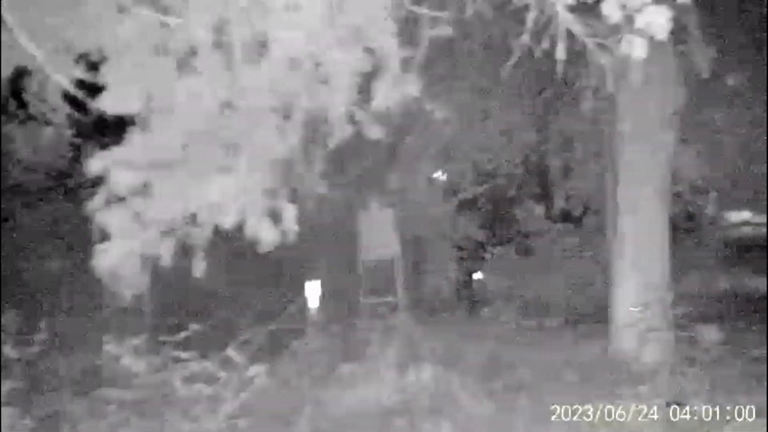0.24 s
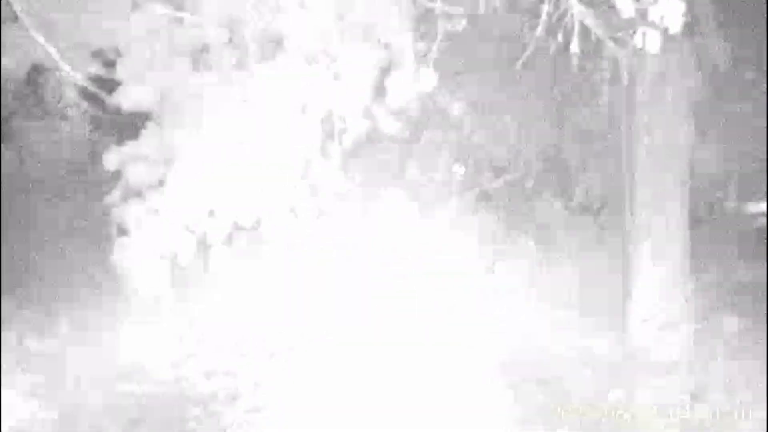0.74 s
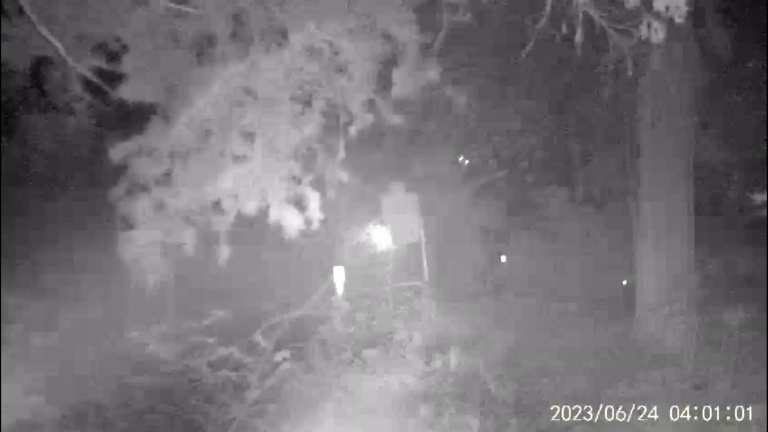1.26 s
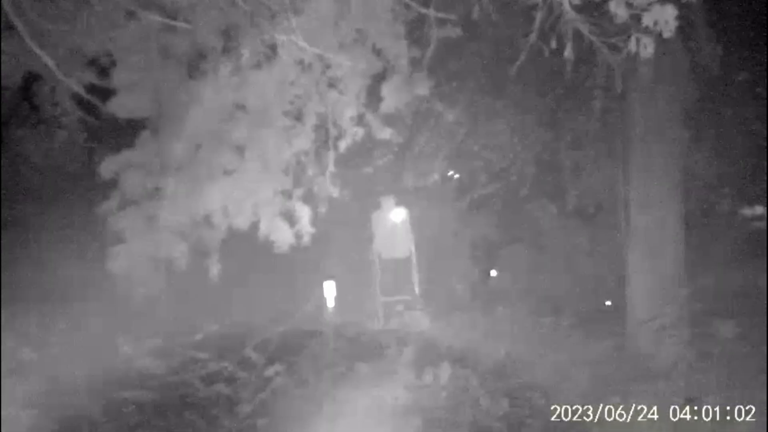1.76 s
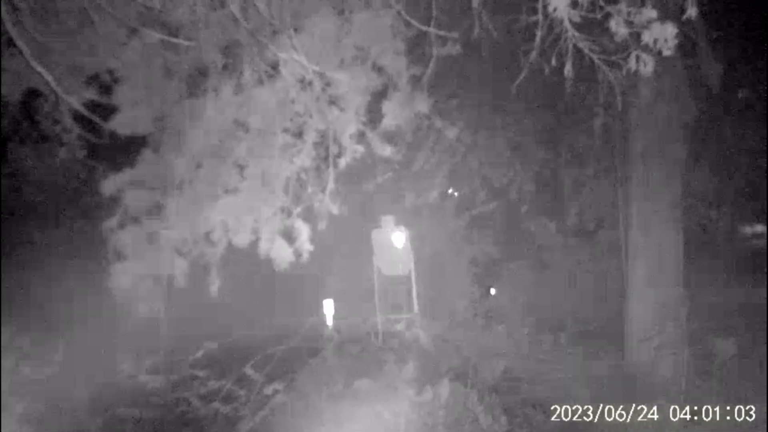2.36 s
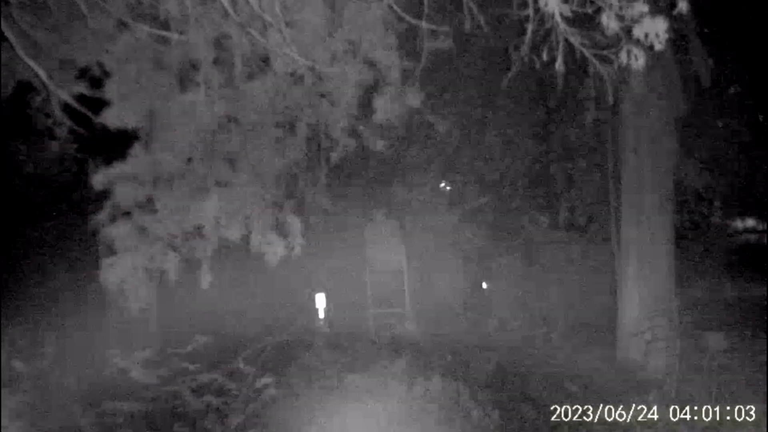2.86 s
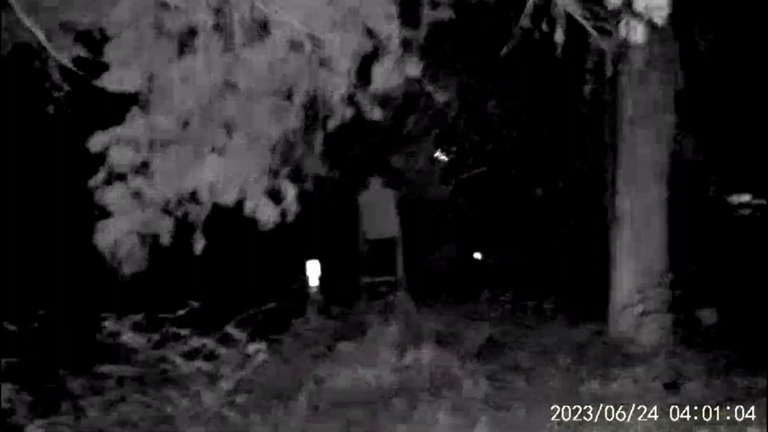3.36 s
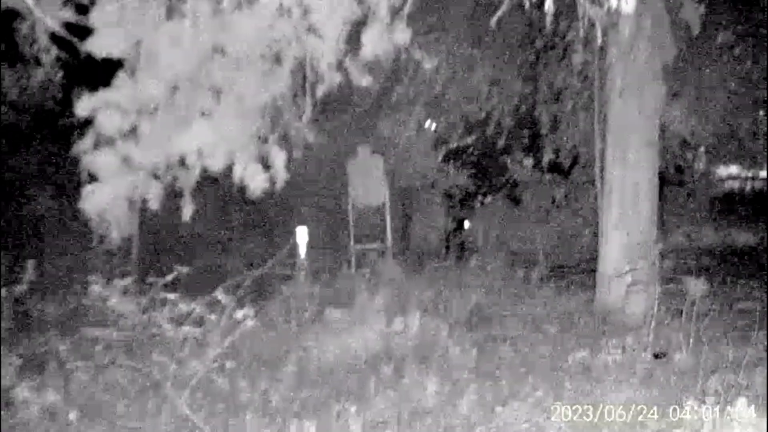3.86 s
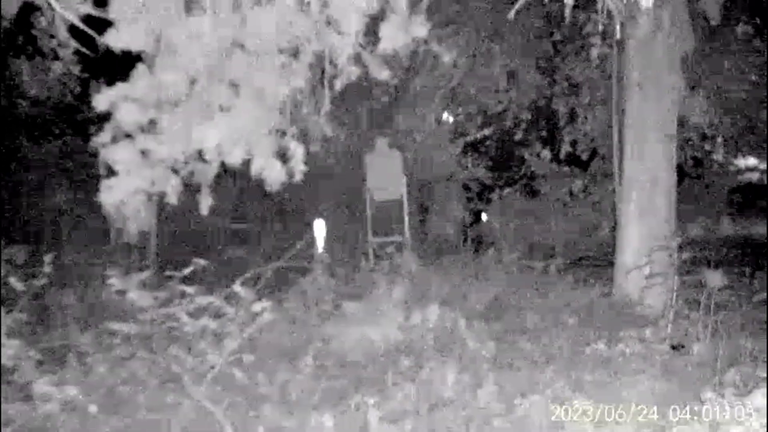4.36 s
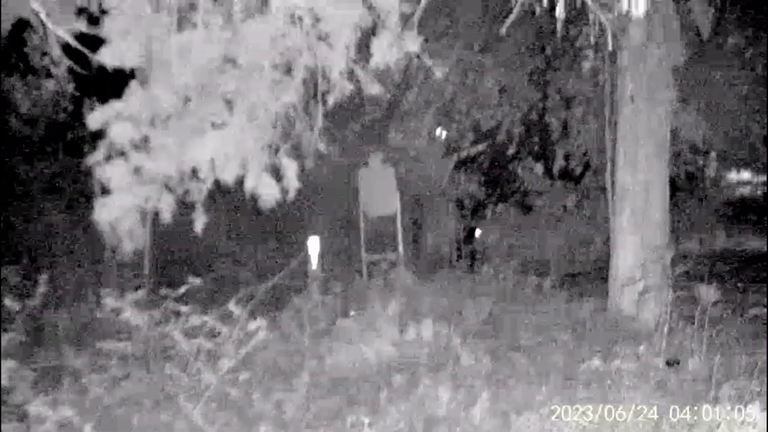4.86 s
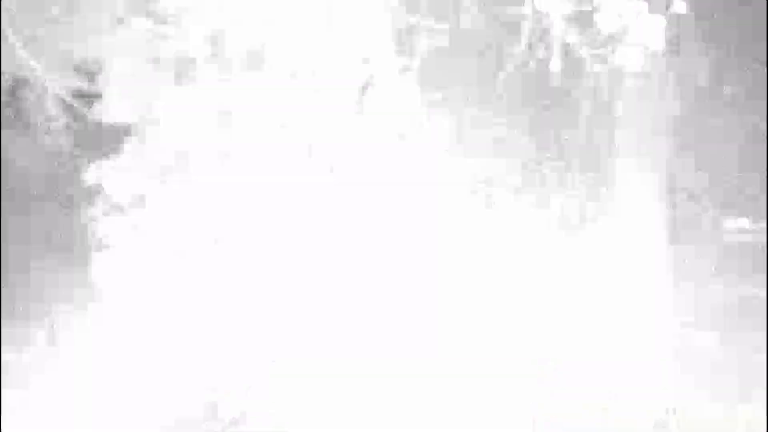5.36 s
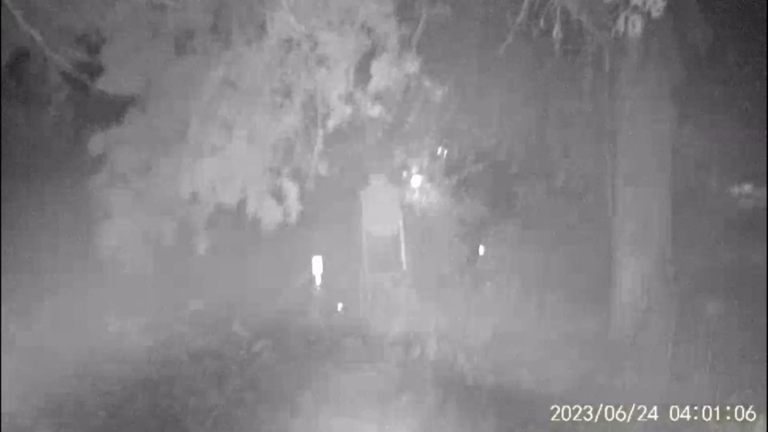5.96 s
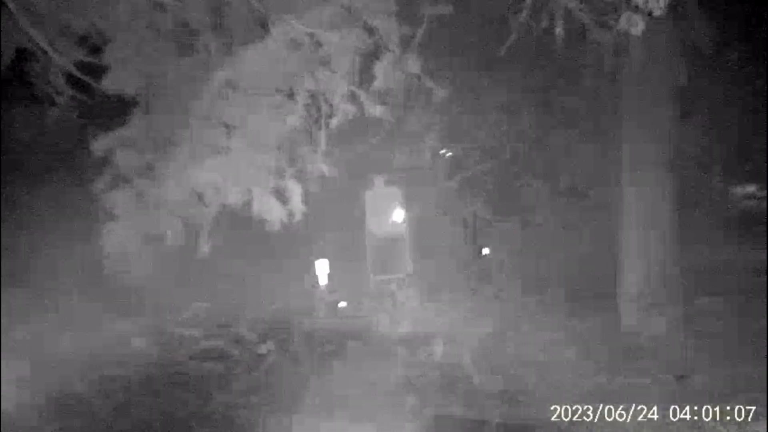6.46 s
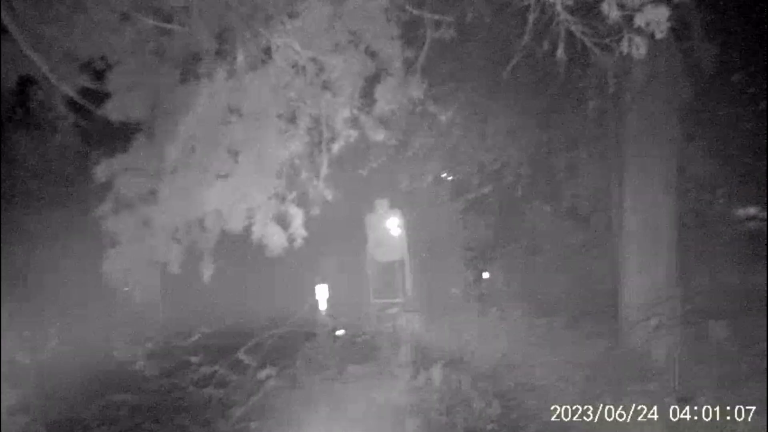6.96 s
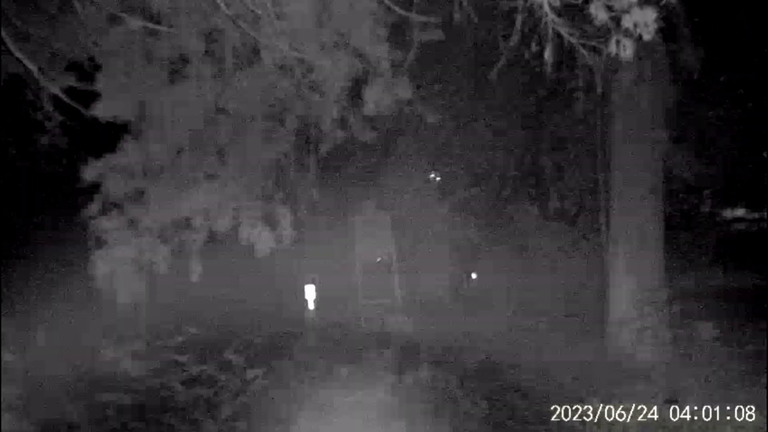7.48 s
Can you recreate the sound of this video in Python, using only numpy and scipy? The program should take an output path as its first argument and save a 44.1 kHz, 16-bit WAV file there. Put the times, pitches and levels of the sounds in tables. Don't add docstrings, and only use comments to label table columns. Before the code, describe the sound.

Close metallic rifle clicks in two quick double trigger pulls, each with a scrape, tiny spring squeak and reset snap, over a quiet night outdoors.

```python
import sys
import numpy as np
from scipy import signal
from scipy.fft import rfft, irfft, next_fast_len
from scipy.io import wavfile
from scipy.ndimage import uniform_filter1d, map_coordinates

SR = 44100
rng = np.random.default_rng(int(sys.argv[2]) if len(sys.argv) > 2 else 0)


def gain_from_db(level_db):
    decades = np.asarray(level_db, float) / 20
    return 10 ** decades


def store_pcm(level_fs):
    pcm = np.round(np.clip(level_fs, -1, 1) * 32767).astype(np.int16)
    wavfile.write(sys.argv[1], SR, np.atleast_2d(pcm).T)


N = 340452

# pitch_hz, level_db (per Hz)
RUMBLE_SPECTRUM = [(12, -41.5), (20, -22.5), (45, -2.5), (65, 2), (150, -5), (256, -10.5), (300, -20),
                   (390, -42.5), (660, -120)]
# pitch_hz, level_db (per Hz)
DRONE_SPECTRUM = [(150, -41), (250, -13.5), (422, -4.5), (447, -5), (530, -3.5), (763, -6.5), (885, -5.5),
                  (980, -8.5), (1480, -12.5), (3800, -36.5), (4940, -66.5), (8360, -120)]
# pitch_hz, level_db (per Hz)
HISS_SPECTRUM = [(1500, -3.5), (3000, -6), (6000, -9), (9000, -14), (10600, -21), (13000, -13),
                 (15500, -16), (15900, -60)]
# time_s, level_db (at 420 Hz), level_db (at 490 Hz)
HUM_LEVELS = [(0, -56, -56.5), (1.2, -56, -57.5), (1.8, -57.5, -64), (3, -60, -70), (4, -68, -72),
              (7.72, -66, -72)]
# pitch_hz, width_hz, level_db
CRICKET_BANDS = [(4400, 850, -73), (4120, 160, -79), (4450, 110, -79)]
# time_s, level_db
CHORUS_SWELL = [(0, 2.5), (1, -1), (2, 0.5), (3, 3.5), (3.8, 4), (4.3, 4.5), (5, 3), (6, -1.5), (7, 0.5),
                (7.72, 0.5)]
RUMBLE_DB, DRONE_DB, HISS_DB = -47.5, -49, -70.5
DRONE_FOLLOWS = 0.17
DUCK_DB, DUCK_S = 4.5, .15

# pitch_hz, level_db (per Hz)
CLOTH_SPECTRUM = [(880, -26), (1500, 0), (2380, -1), (2850, 1.5), (4130, -0.5), (6620, 2), (10400, -7),
                  (14200, -8.5), (15900, -10.5), (16500, -38.5)]
# peak_s, level_db, rise_s (over 20 dB), fall_s (over 20 dB)
CLOTH_STROKES = [(.06, -53.5, .8, .6), (.25, -54, 0.3, 0.4465), (.46, -58.5, 1, 0.3), (.56, -64, .08, .1),
                 (.625, -62, .06, .06), (.7, -66, .08, .05), (.86, -68, .04, .06), (1.3, -75.5, 1.5, 1),
                 (2.68, -63, 0.53, 0.2), (2.9, -65, 0.33, 0.65), (3.1, -58, 0.05, 0.4369),
                 (3.31, -48.5, .5, .15), (3.43, -58, 0.07, .4), (3.7, -67, 0.12, .5), (4.52, -64, .1, 0.9),
                 (4.74, -57, 0.23, .5), (5.02, -49.5, 0.302, 0.3548), (5.13, -54, 0.22, 0.2064),
                 (5.22, -51.5, .3, 0.2241), (5.33, -58, 0.21, 0.16), (5.65, -76, 0.54, 0.08),
                 (7.22, -60.5, 0.07, 0.29), (7.41, -63, .15, .1), (7.5, -63.5, 0.3, .5),
                 (7.69, -52, .2, .15)]

# start_s, level_db (energy in 1 ms), knock_db, snap_db
SEAR = [
    (2.1856, -7.5, -6.5, -11),
    (2.3875, -8.5, -4.5, -10),
    (6.8504, -7.5, -5.5, -8.5),
    (7.0345, -8, -6, -10),
]
RELEASE = [
    (2.2553, -8.5, -7, -8),
    (2.4509, -14.5, -4, -1.5),
    (2.4531, -9.5, -5, -15),
    (6.9154, -10.5, -17, -5.5),
]
HAMMER = [
    (2.2705, -6.5, -11, -12),
    (2.4663, -5.5, -11, -10.5),
    (6.9268, -4.5, -13, -11.5),
    (7.118, -6, -11, -7),
]
RESET = [
    (2.2972, -6, -8.5, -6),
    (2.4847, -7, -8, -5.5),
    (6.9599, -6.2, -7, -5.5),
    (7.1357, -6.5, -7.5, -5),
]
REBOUND = [
    (2.2817, -25, 3, -4),
    (2.4755, -25, 0, -4),
    (6.9363, -24, 2, -4),
    (7.1284, -21, -1, -3),
]
BOUNCE = [
    (2.2175, -21, -6.5, -7),
    (2.241, -30, -6, -8),
    (2.4137, -27.5, -12, -10),
    (6.8756, -26, -6, -6),
    (6.9013, -24.5, -14.5, -22),
    (6.9111, -19, -4, -4),
    (7.0651, -27, 0.5, -8),
    (7.0945, -27, -7, -11.5),
    (7.1024, -18.5, -4.5, -9),
    (7.1418, -22, -3, -10),
]
LEVER_OFF = [
    (0.3522, -33, -7.5, -3.5),
    (0.3573, -14, -5.5, -1),
]
LEVER_ON = [
    (5.0897, -28, -3, -3.5),
    (5.0923, -11, -5.5, 2.5),
]
END_STOP = [
    (2.8249, -16, -13, -6),
    (2.8276, -11.5, -11, -4),
]
LATE_STOP = [
    (7.4287, -17.5, -12, -8),
    (7.4328, -12.5, -10, 1),
    (7.4347, -13.5, -4, 0),
]
CATCH = [
    (5.161, -15, -15, 1),
    (5.1638, -33, 3, -6),
]
SLACK = [(0.102, -43, 2, -26), (1.9334, -25, -6, -16), (2.3703, -28, -4, -6), (3.096, -48.5, -1, -18),
         (3.4262, -37, -2, -9), (3.4569, -41.5, -6.5, -15), (3.5365, -59, -20, 6), (3.645, -51, -14, -12),
         (3.878, -60, -14, -3), (4.6487, -48, -14.5, -16), (5.6524, -54, -15.5, -16),
         (6.8096, -26, -8, -16), (7.012, -29, -4, -5), (7.3965, -53, -20, -2), (7.405, -52, -20, 3),
         (7.6476, -40, -2, -13.5)]
NUDGE = [
    (0.3195, -30.5, -25, -9.5),
    (5.0491, -37.5, -19.5, -15.5),
]
TAP = [
    (0.2951, -41, -20, -25),
    (3.5841, -40.5, -9.5, -19),
]

# pitch_hz, width_hz, level_db
SEAR_MODES = [(480, 150, -19), (958, 170, -4), (1500, 150, -3), (1880, 220, 2), (2350, 350, -1),
              (3330, 480, -2), (4300, 400, -5), (4950, 250, -3), (6000, 900, -10), (7500, 600, -17),
              (8900, 900, -15), (10900, 1500, -15), (13000, 650, -9), (14900, 760, -15)]
RELEASE_MODES = [(600, 250, -13), (950, 200, -7), (1440, 230, -3), (2050, 400, -7), (3040, 330, 0),
                 (3600, 300, -7), (4250, 500, -4), (5200, 500, -12), (7390, 860, -11), (8460, 360, -12),
                 (9350, 330, -13), (12400, 1500, -24), (14100, 500, -18), (15600, 500, -21)]
HAMMER_MODES = [(430, 150, -22), (888, 210, -8), (1300, 200, -12), (1850, 250, -10), (2430, 350, 0),
                (2870, 250, 0), (3450, 300, -8), (4250, 380, -1), (5200, 500, -5), (6300, 600, -11),
                (7400, 500, -16), (8560, 410, -11), (12200, 2500, -26), (15600, 500, -19)]
RESET_MODES = [(620, 150, -14), (964, 190, -5), (1440, 220, -4), (1900, 250, -7), (2250, 300, -6),
               (3150, 450, 0), (4460, 610, -1), (6300, 600, -8), (7290, 480, -5), (8500, 500, -12),
               (10200, 450, -24), (12600, 700, -23), (14100, 500, -17), (15100, 400, -21)]
REBOUND_MODES = [(900, 200, -4), (1500, 250, 0), (2700, 500, -4), (3600, 400, -4), (4600, 600, -7),
                 (5800, 400, -11), (7000, 800, -7), (8500, 600, -8), (9500, 500, -7), (11500, 800, -15),
                 (14000, 1500, -13)]
LEVER_OFF_MODES = [(587, 150, -4), (1030, 120, -14), (1560, 240, -3), (2150, 200, -8), (2900, 300, 0),
                   (3550, 250, -6), (4400, 400, -3), (5000, 260, -10), (5950, 400, -3), (7070, 390, -5),
                   (8300, 390, -5), (9600, 700, -7), (12000, 2000, -13), (15500, 410, -16)]
LEVER_ON_MODES = [(587, 150, -3), (1030, 150, -11), (1560, 300, -2), (2150, 300, -1), (2650, 250, -3),
                  (3250, 300, -2), (4200, 400, -3), (4860, 300, -2), (6200, 330, -2), (7050, 390, 0),
                  (8410, 390, 0), (9900, 900, -5), (13000, 1200, -13), (15500, 410, -16)]
END_STOP_MODES = [(600, 350, -14), (1550, 300, -10), (2300, 300, -7), (2850, 300, 0), (3300, 300, -5),
                  (4000, 400, -10), (4650, 300, -8), (5100, 300, -6), (6300, 500, -13), (7520, 400, -9),
                  (8660, 400, -6), (9700, 500, -13), (11100, 1080, -13), (14200, 1500, -13)]
LATE_STOP_MODES = [(900, 300, -15), (1500, 300, -6), (2200, 300, -8), (2750, 300, -2), (3150, 300, 0),
                   (4300, 450, -3), (4950, 300, -4), (6050, 300, -6), (6800, 400, -3), (7500, 300, -8),
                   (8600, 450, 0), (9500, 300, -8), (11100, 1080, -13), (13400, 1500, -13)]
CATCH_MODES = [(1100, 250, -12), (1600, 250, -12), (2700, 300, -8), (3550, 300, -8), (4650, 600, -1),
               (5600, 400, -4), (7080, 600, 0), (8400, 500, -7), (9800, 500, -8), (11000, 800, -5),
               (13500, 900, -9), (15400, 800, -11)]
SLACK_MODES = [(1000, 300, -12), (1400, 400, -6), (2050, 350, -1), (2800, 450, 0), (3500, 400, -6),
               (4400, 500, -9), (6000, 800, -14), (7370, 600, -13), (8500, 500, -18), (13100, 1500, -31)]
NUDGE_MODES = [(2500, 500, -4), (3550, 400, 0), (4500, 400, -4), (5900, 600, -11), (6900, 600, -9),
               (7750, 500, -8), (9800, 900, -14), (13100, 1500, -22)]
TAP_MODES = [(1900, 500, -10), (2650, 260, 0), (3500, 400, -14), (4400, 500, -14), (5100, 300, -13),
             (7400, 700, -28), (13100, 1500, -32)]
# pitch_hz, knock_share, body_share, snap_share, tick_share
LAYER_SHARES = [(1000, 1, 0, 0, 0), (1750, 1, 0, 0, 0), (2250, 0, 1, 0, 0), (5000, 0, 1, 0, 0),
                (6000, 0, 0, 1, 0), (9800, 0, 0, 1, 0), (11200, 0, 0, 0, 1)]
KNOCK_MS = .5
EVEN_BINS, MODE_BINS = 50, 17
SHARP = 3

# start_s, level_db, pitch_hz
THUDS = [
    (.325, -44, 90),
    (2.863, -44, 70),
    (2.882, -46, 100),
    (3.268, -41, 70),
    (3.373, -40, 70),
    (5.031, -39.5, 181),
    (5.135, -40, 80),
    (7.66, -43, 65),
]

# start_s, pitch_hz, level_db, t60_s
SPRING_RINGS = [(.364, 2800, -45, .06), (2.297, 1631, -50, .5), (2.297, 2800, -49, .2),
                (2.485, 1631, -48, .7), (2.485, 2800, -47, .25), (2.485, 3620, -53, .3),
                (2.485, 4790, -53, .2), (2.836, 2780, -41, .14), (2.83, 4800, -48, .15),
                (2.258, 2900, -32, .05), (2.455, 2900, -34, .05), (.855, 4400, -58, .03),
                (5.163, 2735, -41.5, .2), (6.96, 1631, -50, .5), (7.136, 1631, -51, .6),
                (7.136, 2800, -49, .2), (7.44, 2300, -50, .12)]
# start_s, pitch_hz, width_hz, level_db, t60_s
SHIMMERS = [
    (2.832, 3150, 1300, -42, .12),
    (7.437, 2900, 1100, -44, .07),
    (5.097, 3000, 1200, -45, .08),
]

# start_s, end_s, level_db (scrape)
PULLS = [
    (2.193, 2.303, -35),
    (2.392, 2.489, -34),
    (6.855, 6.953, -34),
    (7.041, 7.139, -35.5),
]
# pitch_hz, level_db (per Hz)
SCRAPE_SPECTRUM = [(300, -26), (1100, -6.5), (1500, -1.5), (2100, -6.5), (3000, -5), (5000, -14),
                   (8500, -16.5), (10500, -23), (16000, -28)]
# pitch_hz, width_hz, level_db (over the scrape)
SLIDE_MODES = [(1080, 110, 8), (1530, 130, 9), (2600, 150, 7), (2920, 150, 7), (4050, 200, 6)]
TAKE_UP_S = .01
SETTLE_DB, SETTLE_POWER = 13, 0.56

# start_s, length_s, first_hz, top_hz, level_db
SQUEAKS = [
    (2.218, .037, 3100, 3570, -31.5),
    (2.404, .047, 2750, 3590, -32.5),
    (6.876, .036, 3100, 3620, -32),
    (7.068, .042, 3330, 3640, -30),
]
# level_db, loudest_at (share of length), arch_db (lost at the far end)
SQUEAK_PARTIALS = [(3, .36, 14), (-13, .3, 30), (-17, .68, 18), (-18, .66, 14)]
CLIMB = .33


def unit(x):
    return x / np.sqrt(np.mean(x ** 2) + 1e-20)


def along(points, hz):
    f, v = np.transpose(points)
    return np.interp(np.log(hz + 1), np.log(f + 1), v)


def curves(rows):
    s, *cols = np.transpose(rows)
    return [np.interp(np.arange(N) / SR, s, c) for c in cols]


def wobble(rate):
    knots = rng.standard_normal(int(N * rate / SR) + 4)
    return map_coordinates(knots, [np.arange(N) * rate / SR])


def noise(gain):
    m = next_fast_len(N)
    spectrum = rfft(rng.standard_normal(m)) * gain(np.fft.rfftfreq(m, 1 / SR))
    return unit(irfft(spectrum, m)[:N])


def modes(table, f, turn=-1):
    return sum(turn ** k * gain_from_db(db) * 1j * f * w / (c * c - f * f + 1j * f * w + 1e-9)
               for k, (c, w, db) in enumerate(table))


def ducking():
    t = np.arange(N) / SR
    busy = sum(((t > s) & (t < end + DUCK_S)) * 1. for s, end, db in PULLS)
    return gain_from_db(-DUCK_DB * uniform_filter1d(np.minimum(busy, 1), size=int(DUCK_S * SR)))


def night():
    duck = ducking()
    hum_db = curves(HUM_LEVELS)
    drone_db = DRONE_DB + DRONE_FOLLOWS * (hum_db[1] - HUM_LEVELS[-1][2])
    out = duck * gain_from_db(RUMBLE_DB + 0.75 * wobble(2.7)) * noise(lambda f: gain_from_db(along(RUMBLE_SPECTRUM, f)))
    out = out + duck ** .5 * gain_from_db(drone_db + wobble(4)) * noise(lambda f: gain_from_db(along(DRONE_SPECTRUM, f)))
    out = out + gain_from_db(HISS_DB) * noise(lambda f: gain_from_db(along(HISS_SPECTRUM, f)))
    for hz, drift_hz, db in zip((420, 490), (3, 9), hum_db):
        phase = 2 * np.pi * np.cumsum(hz + drift_hz * wobble(8)) / SR
        out = out + gain_from_db(db + 4.0 + 1.5 * wobble(5.5)) * np.sin(phase)
    chorus_db = curves(CHORUS_SWELL)[0]
    pulse = gain_from_db(1.5 * np.array([wobble(6), 2 * wobble(12), 2 * wobble(9)]))
    for (hz, w, db), swell in zip(CRICKET_BANDS, pulse):
        band = noise(lambda f: abs(modes([(hz, w, 0)], f)) ** 2)
        out = out + gain_from_db(db + chorus_db) * swell * band
    return out


def cloth():
    t = np.arange(N) / SR
    grain = gain_from_db(.7 * wobble(12) + 0.91 * wobble(25) + 1.2 * wobble(400))
    power = sum(gain_from_db(db - 20 * np.where(t < s, (s - t) / rise, (t - s) / fall)) ** 2
                for s, db, rise, fall in CLOTH_STROKES)
    db = 10 * np.log10(power + 1e-20)
    moving = np.clip((db + 82) / 12, 0, 1)
    fabric = noise(lambda f: gain_from_db(along(CLOTH_SPECTRUM, f)) * (f < 15800))
    return moving * gain_from_db(db + 1.0) * unit(grain * fabric)


def even(power, bins):
    return abs(uniform_filter1d(power, size=bins)) + 1e-12


def rattle(contacts, part, tick_over_db, ms):
    size, room, lead = 4096, 16384, 64
    out = np.zeros(N + room)
    t, late = np.arange(size) / SR, np.arange(room) / SR
    f, room_f = np.fft.rfftfreq(size, 1 / SR), np.fft.rfftfreq(room, 1 / SR)

    edges, *shares = np.transpose(LAYER_SHARES)
    shares = np.array([np.interp(f, edges, share) for share in shares])
    bass = (1j * f / (1j * f + .5 * part[0][0])) ** 3
    families = np.array([modes(part, f, turn) for turn in (1, -1, -1, -1)]) * np.sqrt(shares) * bass
    powers = sum(gain_from_db(db) ** 2 * abs(modes([(hz, w, 0)], f)) ** SHARP for hz, w, db in part)
    powers = powers * shares * abs(bass) ** 2
    powers = powers / powers.sum(axis=1, keepdims=True)

    start = np.clip((t - lead / SR) / .0008, 0, 1) * (t < .05)
    near = gain_from_db(-21.5 - 60 * late / .05) * np.sqrt(1 / 0.13)
    trees = gain_from_db(-25 - 60 * late / 0.32) * np.sqrt(1 / 0.3)
    answer = (near + trees) * (late > .003) * (late < .3) * np.sqrt(2 * np.log(1000) / SR)
    dull = 1 + 1j * room_f / 9000

    span = np.maximum(ms - np.array([[9], [.5], [.7], [1.1]]), KNOCK_MS) / 1000
    shape = np.exp(-(t / (2.3 * span)) ** 1.4)
    chances = rng.standard_normal((len(contacts), 2 * size + room))
    for (s, db, knock_db, snap_db), chance in zip(contacts, chances):
        sign, scatter, echo = np.split(chance, [size, 2 * size])
        blows = rfft(np.roll(sign * gain_from_db(4 * scatter) * shape, lead, axis=1))
        blows = blows / np.sqrt(even(abs(blows) ** 2, EVEN_BINS))
        layers = irfft(blows * families, size) * start
        layers = layers / np.linalg.norm(layers, axis=1, keepdims=True)
        gains = gain_from_db(db + np.array([knock_db, 0, snap_db, snap_db + tick_over_db]))
        ring = rfft(gains @ layers)
        wanted = even(gains ** 2 @ powers, MODE_BINS)
        hit = irfft(ring * np.sqrt(wanted / even(abs(ring) ** 2, MODE_BINS)), size) * start
        hit = hit * np.linalg.norm(gains) / np.linalg.norm(hit) * np.sqrt(SR / 1000)
        heard = irfft(rfft(hit, room) * (1 + rfft(echo * answer) / dull), room)
        out[round((s - .0004) * SR) - lead:][:room] += heard
    return out[:N]


def clicks():
    # contacts, modes, tick against snap in dB, rattle length in ms
    parts = [(SLACK, SLACK_MODES, -14, 1.2),
             (TAP, TAP_MODES, -11, 1.3),
             (NUDGE, NUDGE_MODES, -14, 1.6),
             (LEVER_OFF, LEVER_OFF_MODES, -8.5, 1.5),
             (SEAR, SEAR_MODES, 3.5, 2.0),
             (BOUNCE, RELEASE_MODES, -8, 2.4),
             (RELEASE, RELEASE_MODES, -9, 1.6),
             (HAMMER, HAMMER_MODES, -10, 1.45),
             (REBOUND, REBOUND_MODES, -4, 2.2),
             (RESET, RESET_MODES, -10, 1.5),
             (END_STOP, END_STOP_MODES, -3, 1.35),
             (LEVER_ON, LEVER_ON_MODES, -8.5, 1.6),
             (CATCH, CATCH_MODES, -1, 1.25),
             (LATE_STOP, LATE_STOP_MODES, -7.5, 1.5)]
    return sum(rattle(*part) for part in parts)


def thuds():
    out, t = np.zeros(N + SR), np.arange(SR // 8) / SR
    for s, db, hz in THUDS:
        push = t * hz * np.exp(-1.5 * t * hz) * 4
        out[round(s * SR):][:len(t)] += gain_from_db(db + 4) * push * np.sin(2 * np.pi * hz * t)
    return out[:N]


def springs():
    t, out = np.arange(N) / SR, np.zeros(N)
    detunes = rng.random((len(SPRING_RINGS), 2))
    for (s, hz, db, t60), (apart, turn) in zip(SPRING_RINGS, detunes):
        i = round(s * SR)
        u = t[:min(SR // 2, N - i)]
        twin_hz = hz * (1.008 + .008 * apart)
        pair = np.sin(2 * np.pi * hz * u) + .3 * np.sin(2 * np.pi * twin_hz * u + turn)
        out[i:][:len(u)] += gain_from_db(db - 60 * u / t60) * (1 - np.exp(-u / 0.006)) * pair
    for s, hz, w, db, t60 in SHIMMERS:
        crowd = noise(lambda f: abs(modes([(hz, w, 0)], f)) ** 2)
        out = out + (t > s) * gain_from_db(db - 60 * abs(t - s) / t60) * crowd
    return out * gain_from_db(1.8 * wobble(120))


def scrape():
    t = np.arange(N) / SR
    travel = np.zeros(N)
    for s, end, db in PULLS:
        lost_db = SETTLE_DB * (np.maximum(t - end, 0) / .03) ** SETTLE_POWER
        travel += np.clip((t - s) / TAKE_UP_S, 0, 1) ** 2 * gain_from_db(db - lost_db)
    slips = gain_from_db(wobble(90) + 2.2 * wobble(400) + 2 * wobble(1500))
    steel = noise(lambda f: gain_from_db(along(SCRAPE_SPECTRUM, f)) * np.hypot(1, abs(modes(SLIDE_MODES, f))))
    return travel * unit(slips * steel)


def squeaks():
    t, out = np.arange(N) / SR, np.zeros(N)
    shake, flutter = wobble(400), [wobble(250) for row in SQUEAK_PARTIALS]
    for s, length, first_hz, top_hz, db in SQUEAKS:
        i = slice(round(s * SR), round((s + length) * SR))
        u = (t[i] - s) / length
        gate = np.clip(u / .08, 0, 1) * np.clip((1 - u) / .1, 0, 1)
        hz = top_hz - (top_hz - first_hz) * np.exp(-(abs(u) / CLIMB) ** 1.7)
        phase = 2 * np.pi * np.cumsum(hz * (1 + .008 * shake[i])) / SR
        for k, (over_db, at, arch_db) in enumerate(SQUEAK_PARTIALS):
            level_db = db + over_db - arch_db * abs(u - at) / max(at, 1 - at)
            level_db = level_db + (2.5 + .6 * k) * flutter[k][i]
            out[i] += gate * gain_from_db(level_db) * np.sin((k + 1) * phase)
    return out


def scene():
    return (night() + cloth() + clicks() + thuds() + springs() + scrape() + squeaks())[None]


def band_limit(x):
    return signal.sosfilt(signal.butter(12, 17000, fs=SR, output="sos"), x)


def record(dry):
    soft = dry / (1 + np.abs(dry / .9) ** 6) ** (1 / 6)
    low_pass = signal.cheby2(14, 70, 16900, fs=SR, output="sos")
    return band_limit(signal.sosfilt(low_pass, soft))


dry = scene()
out = record(dry)
store_pcm(out)
```